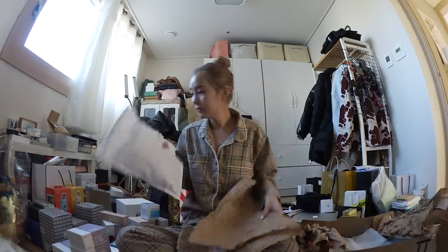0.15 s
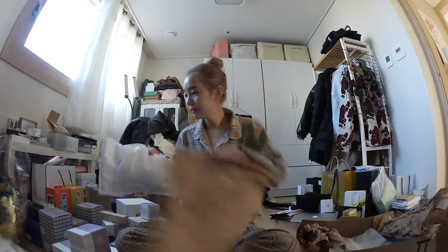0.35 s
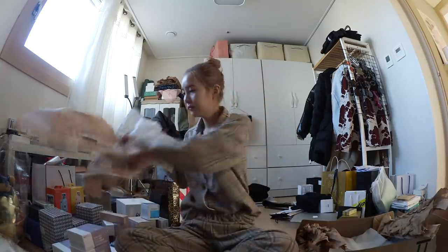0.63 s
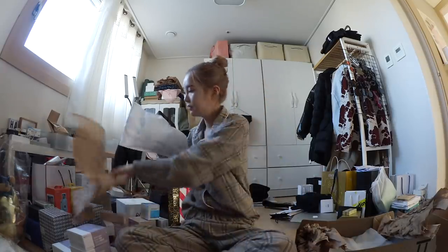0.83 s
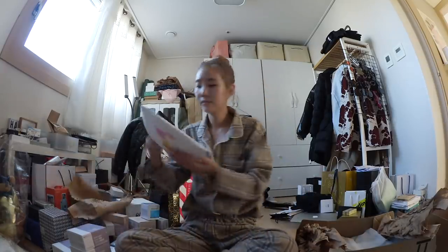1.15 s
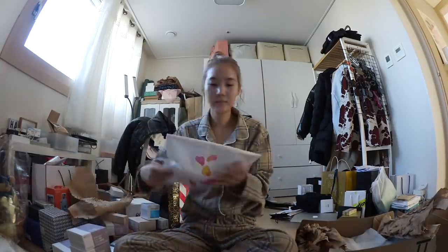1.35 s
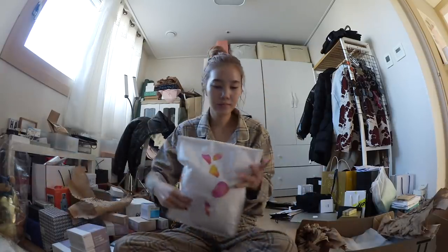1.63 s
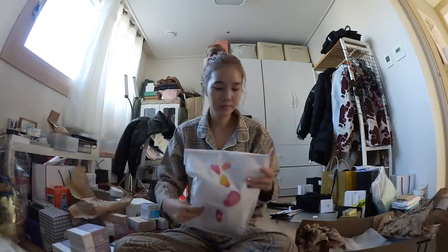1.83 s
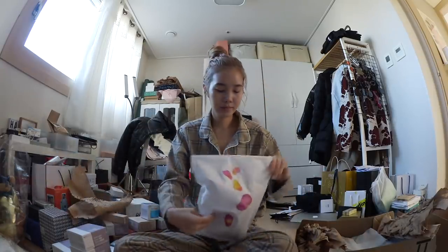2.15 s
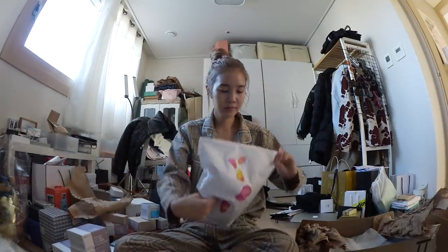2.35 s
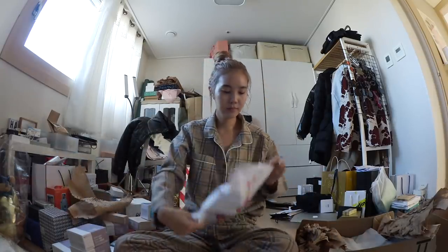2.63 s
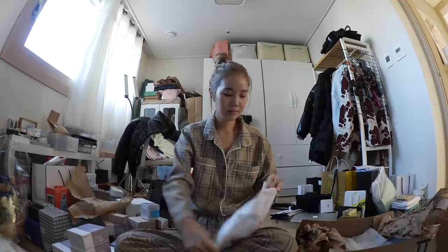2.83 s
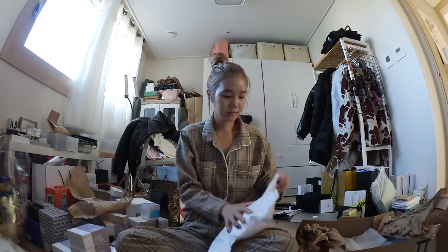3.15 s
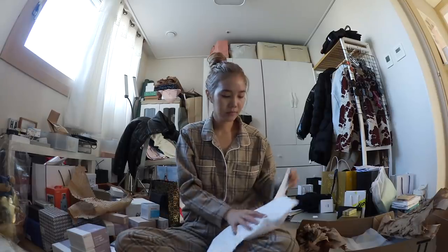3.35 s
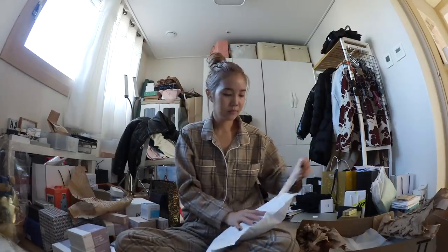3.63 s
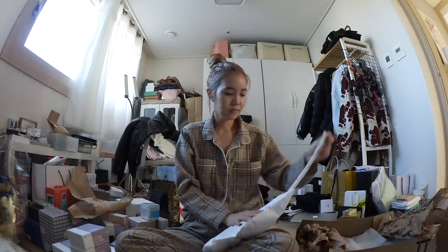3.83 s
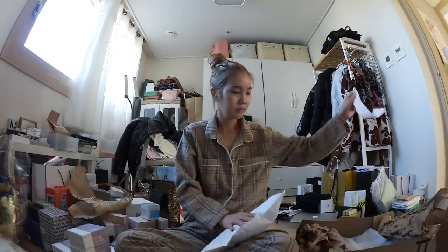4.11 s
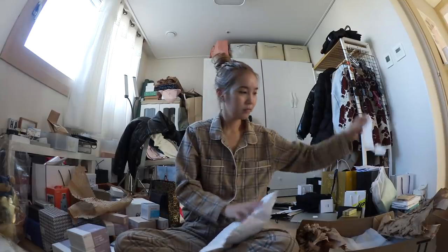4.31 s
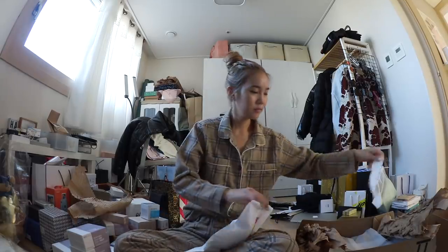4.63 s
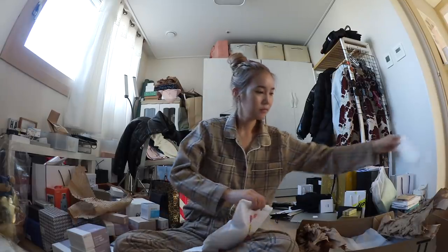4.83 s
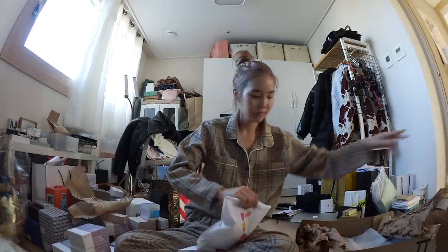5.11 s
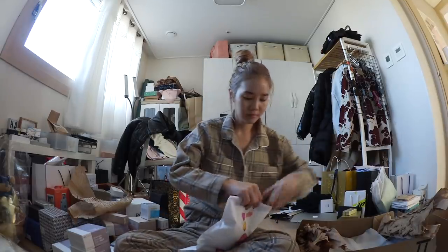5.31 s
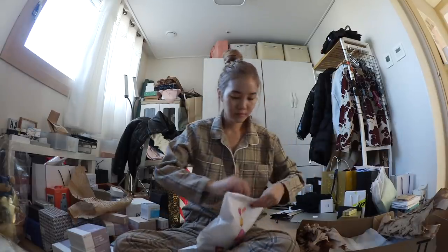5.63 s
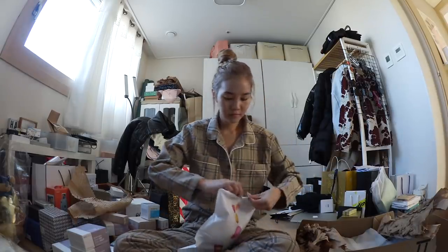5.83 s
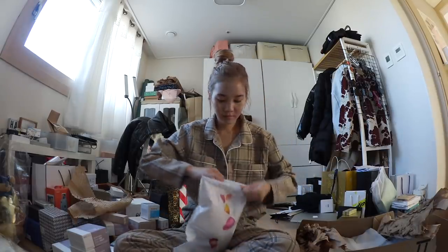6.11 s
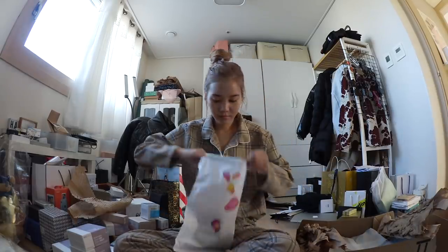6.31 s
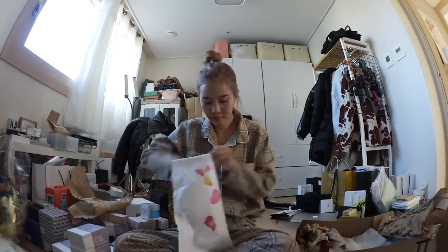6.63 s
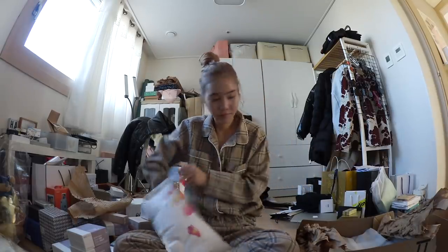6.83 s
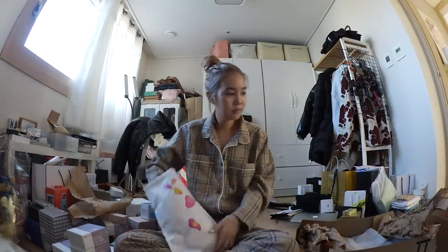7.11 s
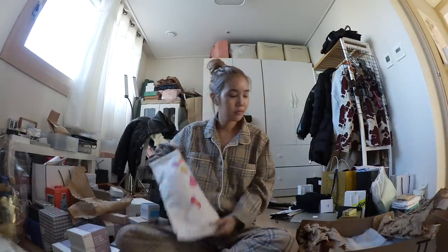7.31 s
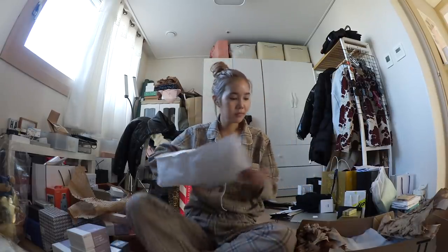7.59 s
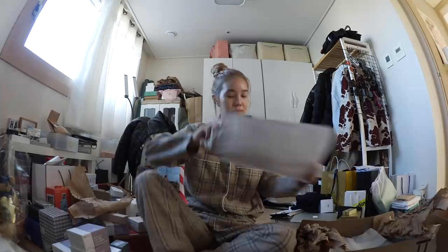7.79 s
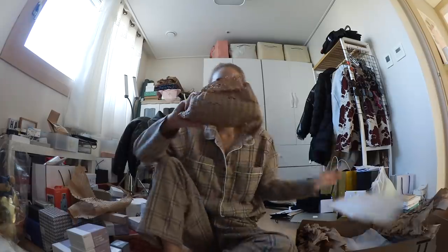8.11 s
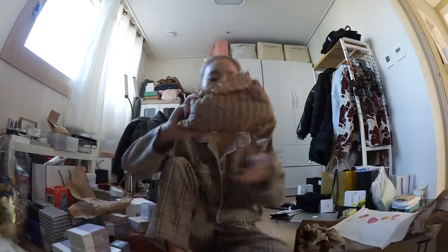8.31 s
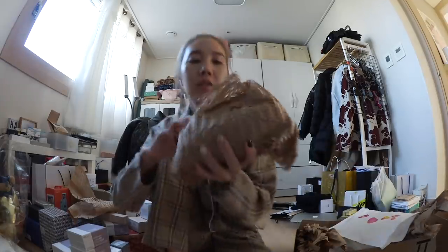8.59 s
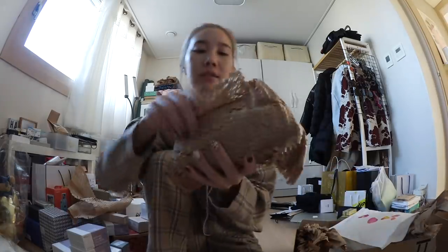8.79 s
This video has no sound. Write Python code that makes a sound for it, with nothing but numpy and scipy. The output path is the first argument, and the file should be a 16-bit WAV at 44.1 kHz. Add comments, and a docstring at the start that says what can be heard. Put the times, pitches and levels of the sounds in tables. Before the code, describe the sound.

Stiff paper crackles almost continuously in busy hands, close and dry, slightly left of centre. Sharp snaps thicken after the first second, swell into loud scrunches around three to four seconds, thin out, then return strongly past six seconds. Low air-filled slaps and boxy panel knocks punctuate it. The end is sparse, light and crisp, over a faint indoor hush.

```python
"""Paper mailer in busy hands

Hands turn, tear and crumple a paper mailer and packing paper, close to two microphone ports in a small room.
Creases snap as noise cracks with ringing facets, over a rustle of countless small noise-burst buckles.
Slaps on the bag's air pocket and knocks of a folded panel are short damped tones.
Near echoes from floor and lap colour all the paper; a short room answer, room tone and rumble lie behind it."""
import sys
import numpy as np
from scipy import signal
from scipy.fft import rfft, irfft, next_fast_len
from scipy.io import wavfile
from scipy.ndimage import uniform_filter1d, map_coordinates

SR = 44100
rng = np.random.default_rng(int(sys.argv[2]) if len(sys.argv) > 2 else 0)


def master_out(mix):
    """Clip the mix to full scale and print it as 16-bit PCM to the path in sys.argv[1]."""
    frames = np.transpose(np.atleast_2d(mix))
    ceiling = np.clip(frames, -1, 1)
    pcm = np.round(ceiling * 32767).astype(np.int16)
    wavfile.write(sys.argv[1], SR, pcm)


N = 394694  # length in samples


def amp(db):
    """Gain of a dB value."""
    return 10 ** (np.asarray(db) / 20)


def unit(x):
    """Scaled to rms 1."""
    return x / np.sqrt(np.mean(x ** 2) + 1e-20)


def along(points, hz):
    """Reads (Hz, value) points on a log frequency axis."""
    point_hz, value = np.transpose(points)
    return np.interp(np.log(hz + 1), np.log(point_hz + 1), value)


def curves(rows):
    """One value per sample for each column after the time."""
    s, *columns = np.transpose(rows)
    return [np.interp(np.arange(N) / SR, s, column) for column in columns]


def wobble(rate):
    """A smooth random curve, rate knots a second."""
    knots = rng.standard_normal(int(N * rate / SR) + 4)
    return map_coordinates(knots, [np.arange(N) * rate / SR])


def filtered(x, response):
    """x times a response of frequency."""
    size = next_fast_len(N + 8192)  # padding keeps the end from wrapping onto the start
    return irfft(rfft(x, size) * response(np.fft.rfftfreq(size, 1 / SR)), size)[..., :N]


def panned(pan_db):
    """Left and right gain for a left-over-right difference in dB."""
    return amp(np.array([pan_db / 2, -pan_db / 2]))


def overlaid(s, gain, shapes):
    """Adds one shape per start time into a full-length track, once for each row of gains."""
    start = np.round(s * SR).astype(int)
    where = (start[:, None] + np.arange(shapes.shape[1])).ravel()
    return np.array([np.bincount(where, (g[:, None] * shapes).ravel(), N + SR)[:N] for g in gain])


def strokes(length_s, rise_ms, fall_ms):
    """Exponential rise and fall of peak 1, one row per fall time, with the time axis in ms."""
    ms = np.arange(int(SR * length_s)) * 1000 / SR
    shape = (1 - np.exp(-ms / rise_ms)) * np.exp(-ms / fall_ms[:, None])
    return ms, shape / shape.max(axis=1, keepdims=True)


def bursts(s, gain, rise_ms, fall_ms):
    """Envelope of many bursts that rise fast and die away; their powers add."""
    _, shape = strokes(.05, rise_ms, fall_ms)
    return np.sqrt(overlaid(s, np.asarray(gain) ** 2, shape ** 2))


def rings(s, gain, hz, rise_ms, fall_ms):
    """Damped tones that start at the given moments."""
    ms, shape = strokes(.08, rise_ms, fall_ms)
    return overlaid(s, gain, shape * np.sin(2 * np.pi * hz[:, None] * ms / 1000))


# How unlike the two ports hear a noise. Each row: frequency in Hz, side over mid in dB.
SPREAD = [(60, -25), (110, -42), (200, -20), (380, -24.5), (700, -12.5), (1290, -9), (2380, -28.5),
          (4400, -14), (8120, -11.5), (15000, -9)]


def hiss(spectrum, patchy_db):
    """Stereo noise in small ringing patches: a shared part, plus and minus a part that tells the ports apart."""
    grid = signal.stft(rng.standard_normal((2, N)), nperseg=256)[2]
    patches = uniform_filter1d(rng.standard_normal(grid.shape[1:]), size=3, axis=0)
    patches = uniform_filter1d(patches, size=4, axis=1)
    pair = signal.istft(grid * amp(patchy_db * unit(patches)), nperseg=256)[1][:, :N]
    mid, side = filtered(pair, lambda hz: amp(along(spectrum, hz) + [0 * hz, along(SPREAD, hz)]))
    return np.array([mid + side, mid - side])


# Colour of the paper, as a shape within each range. Each row: frequency in Hz, relative density in dB per Hz.
PAPER = [(18, -58), (30, -19), (131, -8), (200, -10.5), (400, -3.5), (640, 2), (1000, 0.5), (2200, -0.5),
         (4030, -7), (7790, -9), (13900, -22), (16300, -50)]
# Borders between the five ranges of the sheet, lowest first, in Hz.
EDGES_HZ = [300, 1200, 4500, 9500]


def sheet_noise(patchy_db):
    """The sheet's vibration in five ranges of rms 1: air pocket, body, face, crisp edge, sizzle."""
    noise = hiss(PAPER, patchy_db)
    below = [filtered(noise, lambda hz: 1 / (1 + (hz / border) ** 6)) for border in EDGES_HZ]
    return [unit(upper - lower) for lower, upper in zip([0] + below, below + [noise])]


# Where the hands are. Each row: time in seconds, left over right in dB.
PLACE = [(0, 2.5), (.55, 3), (.7, 4.5), (1.1, 5), (1.3, 1.5), (2.5, 1.5), (3.8, 1), (4.3, 1.5), (7.4, 2.1),
         (8.05, 1), (8.27, -3), (8.34, 3), (8.95, 2)]
SNAP_MS = 2.25  # fall time of the crack's face range
CREST_DB = 8  # the noise envelope sits this far under the listed crease level


def snaps():
    """A crease lets go: a crack whose treble dies first, and the freed facet rings at its own pitch."""
    s, db, hz, crisp_db, body_db = creases()
    ms = SNAP_MS + 0 * s
    _, body, face, edge, sizzle = sheet_noise(patchy_db=0.5)
    pan_db = np.interp(s, *np.transpose(PLACE)) + 0.66 * rng.standard_normal(len(s))
    gain = amp(db - CREST_DB) * panned(pan_db)
    # the ring takes the level of the range its pitch falls in
    facet_db = np.where(hz < EDGES_HZ[1], body_db, np.where(hz < EDGES_HZ[2], 0, crisp_db))
    return (body * bursts(s, gain * amp(body_db), rise_ms=1.3, fall_ms=1.98 * ms)
            + face * bursts(s, gain, rise_ms=0.21, fall_ms=ms)
            + edge * bursts(s, gain * amp(crisp_db), rise_ms=.25, fall_ms=0.99 * ms)
            + sizzle * bursts(s, gain * amp(crisp_db - 19.5), rise_ms=0.12, fall_ms=0.27 * ms)
            + rings(s, gain * amp(facet_db + 3.0), hz, rise_ms=0.11, fall_ms=0.61 * ms + 2500 / hz))


# Creases that snap loudly. Each row: start in seconds, level in dB, ring pitch in Hz,
# crispness over the face range in dB, body over the face range in dB.
SNAPS = [(0.0172, -9, 1560, -2, -6), (0.168, -12, 1870, -1, -11), (0.2184, -9.5, 2110, -1.5, -6.5),
         (0.3108, -11, 2060, -4, -12), (0.3578, -15, 2020, -13, -2), (0.3724, -26, 6600, -3, -9),
         (0.384, -15, 657, -11, -2.5), (0.4214, -22, 7180, 3.5, -11), (0.6066, -23, 2930, -6, -15),
         (0.6115, -15, 2920, -12, -18), (0.6868, -26, 689, -15, -0.5), (0.7756, -13.5, 1930, -2, -5),
         (0.829, -17, 734, -10, -4), (1.1192, -12, 2320, 2, -13), (1.1284, -12, 533, -12, -3),
         (1.1388, -13.5, 2240, 3, -9), (1.198, -14.5, 3040, -12, -1.5), (1.2153, -15.5, 886, -9, -7),
         (1.2585, -6.5, 2260, 5.5, -10.5), (1.2885, -12.5, 560, -5, -7), (1.3534, -10, 2170, -15, -11),
         (1.3663, -10, 2350, -7, -7), (1.3976, -10, 1490, -5, -9), (1.4182, -14, 2460, -3, -12),
         (1.4381, -9, 2200, 3.5, -16), (1.4789, -6, 2050, -2, -22), (1.4851, -8, 1590, 5.5, -22),
         (1.5004, -15, 684, 4, -11), (1.51, -7.5, 616, -12, -7), (1.5667, -11, 2150, -7, -1.5),
         (1.5805, -10.5, 1970, -1, 1), (1.5915, -10.5, 633, -5, -1), (1.6134, -17, 6000, -1, -9),
         (1.6185, -13, 2050, -3, -9), (1.625, -13, 1590, 2, -9), (1.634, -16, 1980, -8, -9),
         (1.6626, -12, 587, -11, -5), (1.6758, -4.5, 3170, 1, -15), (1.6934, -10, 563, -3, -6),
         (1.7085, -3, 2090, -8, -12), (1.7547, -12, 6590, 0.5, -7), (1.7883, -4, 1900, -4, -8),
         (1.7991, -6, 2230, 4, -9), (1.8395, -12.5, 2430, -3, -9), (1.852, -11, 7190, 3.5, -9),
         (1.869, -10.5, 3490, -1, -3), (1.882, -16, 2540, 8, -12), (1.9033, -11, 2410, -9, -5),
         (1.9096, -7.5, 2360, -2.5, -6), (1.936, -13, 1570, -1, -4), (1.957, -13, 622, -3, -6),
         (1.9718, -13.5, 640, -5, -10), (1.992, -6.5, 2160, 1.5, -25), (2.0517, -20, 2350, -7, -7),
         (2.0794, -9.5, 1500, 0, -6), (2.1056, -11.5, 2220, -0.5, -10), (2.1994, -8.5, 2060, -1.5, -6),
         (2.2194, -10.5, 2450, -5, -5), (2.2283, -6.5, 626, -15, -8), (2.2412, -7, 2670, -6, -5),
         (2.257, -12, 2180, -7, -5), (2.2977, -9, 2420, -21, -12), (2.3272, -8.5, 3160, 0.5, -16),
         (2.3408, -10, 1410, -3, -12), (2.3597, -6.5, 1460, -16, -3.5), (2.3754, -14, 1500, -6, -7),
         (2.4153, -17, 2110, -4, -9), (2.4527, -10.5, 2340, -11, -6), (2.4572, -10, 1590, -12, -13),
         (2.4696, -2.5, 2270, -14, -19), (2.495, -9.5, 2340, -1.5, -14), (2.5054, -11, 640, -1, -12),
         (2.551, -5.5, 8050, 2.5, -11), (2.5801, -7, 2280, -8, -17), (2.6011, -4, 622, -6, -10),
         (2.619, -8, 2620, 3.5, -10), (2.632, -7, 3250, 2.5, -17), (2.6601, -9.5, 2390, 5, -16),
         (2.7088, -7.5, 3350, 1, -7), (2.7241, -13.5, 1450, 2, -3), (2.7746, -8.5, 2970, -0.5, -4.5),
         (2.7928, -9.5, 2720, -3, -6.5), (2.829, -11, 1630, -1, -13), (2.8938, -12, 690, -24, -0.5),
         (2.9078, -6.5, 2110, -3, 0), (2.9158, -6, 1460, 3, -2), (2.9844, -14, 2280, 0, -9),
         (3.0378, -11, 1310, 4.5, -15), (3.0591, -5, 1420, -4, -21), (3.1111, -10.5, 1610, -1, -6),
         (3.1298, -13, 1400, -14, 0), (3.1647, -9.5, 650, -4, -2), (3.1843, -17, 3170, -1, -9),
         (3.1908, -14, 2370, 4, -14), (3.2085, -8, 1450, -4, -13), (3.2947, -7, 980, -6, -5),
         (3.345, -5, 2170, -12, -1), (3.4261, -10, 2130, -6, -7), (3.4594, -1.5, 1360, -5, -4),
         (3.4744, -5, 1390, -1, -3), (3.5239, -14, 3250, -3, -10), (3.6057, -15.5, 5550, 3, 0),
         (3.686, -13, 2050, -6, -11), (3.7569, -6.5, 2510, -3, -6), (3.917, -4, 2000, -20, -7),
         (3.9405, -5, 2450, -4, -13), (3.9664, -9, 2540, 0, -18), (4.0164, -19.5, 4630, 5, -18),
         (4.0404, -19, 7680, -1, -9), (4.1255, -15.5, 2700, -12, -4.5), (4.1322, -13.5, 1490, -1, -11),
         (4.249, -9.5, 1470, 3, -12), (4.3002, -21, 630, -9, -2), (4.3433, -10.5, 3000, -6, -0.5),
         (4.365, -10, 1400, -24, -1), (4.4448, -16, 945, -17, 3), (4.539, -15.5, 1560, -14, -3),
         (4.5543, -11.5, 1830, -20, -1.5), (4.5977, -17, 2240, -15, -1), (4.6524, -22.5, 4060, -5, -12),
         (4.7051, -13.5, 3240, 5.5, -9), (4.7433, -10.5, 1430, -9, -10), (4.802, -13, 1610, 3, -3),
         (4.805, -18, 6270, 9, -9), (4.8281, -9.5, 2470, 8, -10), (4.8473, -10, 2510, -1, -13),
         (4.8546, -14.5, 2430, -3, -16), (4.8893, -19, 1560, -5, -9), (4.8993, -21.5, 3100, -3, -16),
         (4.9157, -11, 1910, -12, -8), (4.95, -17.5, 1030, -9, -11), (5.0649, -24, 2200, 4, -9),
         (5.0861, -12.5, 1390, -6, -6), (5.1138, -9, 929, 1.5, -5), (5.1395, -5, 2360, 1.5, -10),
         (5.188, -16, 1460, -3, -6), (5.227, -24, 1390, -8, -6), (5.2465, -20.5, 2040, -15, 2.5),
         (5.293, -22, 6550, 1, -9), (5.3085, -13, 5900, -2.5, -21), (5.3527, -26, 3120, 0, -11),
         (5.3924, -14, 1120, -6, -9), (5.5009, -14.5, 6200, -3, -12), (5.566, -9, 1460, -2, -9),
         (5.5843, -12.5, 1400, -1, -7), (5.6093, -7.5, 2230, -4, -6), (5.6738, -20, 1040, -17, -1),
         (5.7, -17, 3160, -3, -4), (5.7107, -10.5, 6020, 5, -5), (5.7744, -14, 667, -20, 3.5),
         (5.799, -15.5, 8000, 7, -9), (5.8232, -14.5, 1430, -2, -3), (5.8848, -12.5, 5700, 2.5, -16),
         (5.914, -11, 3460, -4.5, -7), (5.9803, -19, 2440, 6, -5), (6.0606, -18, 3080, -3, -9),
         (6.0896, -14, 625, 6, -9), (6.124, -12, 2120, -0.5, -15), (6.1838, -9, 1030, -7, 1),
         (6.2066, -18, 685, -11, -5), (6.2362, -8.5, 634, -4, -5), (6.2499, -4.5, 2000, 4, -8),
         (6.2721, -1.5, 4740, -2, -12), (6.2814, -8, 2210, 8.5, -13), (6.3028, -7.5, 2450, 7, -6),
         (6.3526, -8, 930, -6, -2), (6.38, -12, 2650, -0.5, -3), (6.405, -18, 923, 1, -9),
         (6.454, -17.5, 2900, 2, -16), (6.479, -12.5, 2880, -1.5, -15), (6.5208, -8.5, 2040, -2, -14),
         (6.545, -9, 1040, -6, -3), (6.5604, -17.5, 3820, -9, -1.5), (6.608, -16, 2880, 4, -14),
         (6.6845, -8.5, 1400, -7, -7), (6.7101, -8.5, 1930, 3, -2), (6.7358, -8, 2930, 0, -7),
         (6.7446, -9.5, 2150, 4.5, -5), (6.7625, -10.5, 1510, -11, -7), (6.787, -7.5, 2500, -2, -4.5),
         (6.8256, -8.5, 1560, 0, -7), (6.8428, -9, 3360, -12, -3), (6.8658, -10.5, 1490, 1, 1),
         (6.8734, -13, 5930, -1, -9), (6.8954, -15.5, 2540, 11, -9), (6.9023, -5, 1830, -1, -5),
         (6.9212, -9.5, 1840, 2.5, -13), (7.0125, -18, 2000, -19, 2.5), (7.0264, -15, 2100, -17, -7),
         (7.0574, -15, 1460, -16, -7), (7.0703, -12, 975, -20, -3), (7.0874, -15, 692, -3, -5),
         (7.1838, -7, 4440, -3, -6), (7.1912, -9.5, 1490, -9, -7), (7.2067, -13.5, 1450, -11, -12),
         (7.2856, -14.5, 517, 5.5, -0.5), (7.3174, -21, 452, -3, -2), (7.3555, -7.5, 2070, 2, -4.5),
         (7.3614, -10, 4540, -0.5, -5), (7.3704, -15, 635, 1, -4), (7.393, -13.5, 2140, 3.5, -3),
         (7.4588, -11.5, 6340, 2.5, -16), (7.485, -14.5, 3000, -1, -7), (7.543, -11.5, 5720, -0.5, -4.5),
         (7.6291, -16, 1990, -3, -13), (7.6554, -8, 650, -2, -9), (7.711, -17, 5660, 4, -12),
         (7.7196, -8, 5550, -0.5, -13), (7.7682, -13, 1640, -1, -12), (7.8396, -20, 630, -8, -12),
         (7.879, -12.5, 1580, -14, -6), (7.988, -12.5, 2300, 7, -9), (7.9984, -12.5, 7700, 2.5, -14),
         (8.1262, -19, 2510, 5.5, -7), (8.1388, -16.5, 2100, -1, -2.5), (8.1766, -31, 6400, 9.5, -9),
         (8.2617, -15.5, 1430, 4.5, -14), (8.3009, -11, 1430, -1, -7), (8.3225, -12.5, 2240, 1, -7),
         (8.503, -26, 5600, 7, -13), (8.539, -22.5, 6700, 17, -13), (8.6313, -19.5, 7100, 7.5, -7),
         (8.7182, -19, 7490, 7, -7), (8.8752, -18.5, 7290, 7, -14), (8.8829, -17, 8500, 6, -9),
         (8.9101, -28, 6290, -1, -9), (8.9424, -22, 7140, -3, -9)]
TICKS_PER_S, TICK_DB = 25, 5.5  # small creases: rate, least level over the effort curve
BODY_DB = -5.5  # body share of a small crease that rings at 2 kHz
BODY_DB_PER_OCTAVE = -3  # a larger, lower facet moves more of the sheet


def creases():
    """The loud snaps, and small ones that come at random and are as strong as the hands work."""
    count = int(TICKS_PER_S * N / SR)
    when, size, pitch, crisp = rng.random((count, 4)).T
    s = when * (N - 1) / SR
    hz = 900 * 2 ** (3 * pitch)  # within three octaves
    db = np.interp(s, *np.transpose(EFFORT)) + TICK_DB + 8 * size
    crisp_db = 12 * crisp - 9
    body_db = BODY_DB + BODY_DB_PER_OCTAVE * np.log2(hz / 2000)
    return np.hstack([np.transpose(SNAPS), [s, db, hz, crisp_db, body_db]])


TRAIL_DB, TRAIL_MS = -24, 15  # rustle after a snap: level against the snap, fall time


def settling():
    """After each loud snap the sheet rustles on for a moment."""
    s, db = np.transpose(SNAPS)[:2]
    return bursts(s, [amp(db + TRAIL_DB)], rise_ms=2.44, fall_ms=TRAIL_MS + 0 * s)[0]


# How hard the hands work the paper. Each row: time in seconds, level of the rustle's face range in dB.
EFFORT = [(0, -42), (.123, -45.5), (.34, -40), (.588, -47), (.69, -44), (.74, -31), (.81, -30.5),
          (.926, -58.5), (.964, -44.5), (1.098, -41), (1.241, -40.5), (1.34, -33), (1.421, -24.5),
          (1.463, -36), (1.58, -34.5), (1.919, -37), (2.03, -38.5), (2.17, -37.5), (2.24, -33),
          (2.348, -30.5), (2.43, -37.5), (2.619, -29.5), (2.695, -30), (2.85, -41), (2.931, -22.5),
          (3.258, -39.5), (3.348, -24.5), (3.451, -19.5), (3.49, -26), (3.585, -40.5), (3.629, -27.5),
          (3.804, -20), (3.953, -23), (4.001, -34), (4.106, -44.5), (4.209, -47), (4.3, -40.5),
          (4.549, -33), (4.637, -50), (4.67, -40), (4.843, -38), (5.015, -47), (5.08, -40.5), (5.268, -45),
          (5.354, -39.5), (5.398, -32.5), (5.467, -44), (5.557, -28.5), (5.676, -45), (5.903, -34.5),
          (5.95, -44), (5.982, -38), (6.079, -30.5), (6.165, -37), (6.279, -25.5), (6.43, -38),
          (6.549, -32.5), (6.585, -36), (6.618, -28.5), (6.701, -25), (6.817, -37.5), (6.908, -24.5),
          (6.996, -41.5), (7.084, -32.5), (7.275, -33), (7.42, -38), (7.749, -32.5), (7.829, -25),
          (7.986, -25.5), (8.053, -41.5), (8.14, -42), (8.25, -58.5), (8.263, -29.5), (8.336, -27),
          (8.394, -40), (8.473, -48.5), (8.55, -34.5), (8.726, -37.5), (8.804, -52.5), (8.888, -37),
          (8.95, -29)]
# Colour of the rustle. Each row: time in seconds, body over face in dB, crisp edge over face in dB,
# sizzle over crisp edge in dB.
COLOUR = [(0, -4.5, -1, -7), (.38, -3.5, 1.5, -6), (.6, -5.5, -3, -9), (1, -3.5, -1, 2.5),
          (1.2, -4, -2, -15), (2.4, -2, -7, -17), (2.9, -3, -2.5, -11.5), (3.3, 6, -2.5, -10),
          (3.42, -4.5, -1.5, -6.5), (3.8, -3, -1.5, -7.5), (3.95, -3.5, -3, -2.5), (4.1, -1.5, 1.5, -16),
          (4.5, 0.5, -2.5, -10), (5, -4.5, -5, -12), (5.9, 1, -1.5, -19), (6.28, -3.5, -6.5, -11),
          (6.4, 0, -1.5, -14), (6.62, -12, -4.5, -23), (6.7, 2, -3.5, -20), (7.3, -1, 0.5, -19),
          (7.8, 0, -1, -22), (8, -6.5, -2.5, -7), (8.28, 0, -2.5, -17), (8.46, -1.5, -2, -11),
          (8.55, -8, 8.5, -10), (8.78, 0.5, 6, -8), (8.95, -4, 7, -5)]
# Bass beyond what the effort gives. Each row: time in seconds, gain of the air pocket in dB.
BASS = [(0, 3), (.7, -6), (1.2, -1.5), (2.4, -0.5), (2.95, 0), (3.2, 1), (3.8, -7), (4.3, 1.5), (5.4, 0),
        (6, -1.5), (7.3, -4), (7.85, -2.5), (8, -5.5), (8.2, 7), (8.33, 12), (8.45, 3), (8.58, -7),
        (8.76, 3.5), (8.95, 1)]
POCKET_DB, POCKET_FOLLOWS = -43, .8  # air pocket at an effort of -33.5 dB; dB gained per dB of effort


def rustle():
    """The moving sheet buckles hundreds of times a second, in clumps; the air pocket follows the effort."""
    effort_db, = curves(EFFORT)
    body_db, crisp_db, sizzle_db = curves(COLOUR)
    pocket, body, face, edge, sizzle = sheet_noise(patchy_db=2.5)
    per_second = 600 * amp(2.9 * wobble(40))
    happens = rng.random(N) < per_second / SR
    # doubling the dB turns a level into a power
    shared = happens * amp(2 * 2.45 * rng.exponential(size=N).clip(0, 3))
    sheet = (body * amp(body_db) * buckles(shared, own_db=0.5, fall_ms=6.8, smooth=0.057)
             + face * buckles(shared, own_db=5.0, fall_ms=8.0, smooth=0.32)
             + edge * amp(crisp_db) * buckles(shared, own_db=0.5, fall_ms=4.3, smooth=0.46)
             + sizzle * amp(crisp_db + sizzle_db) * buckles(shared, own_db=2.0, fall_ms=2.3, smooth=0.24))
    strength = np.hypot(amp(effort_db), settling())
    pocket_db = POCKET_DB + POCKET_FOLLOWS * (effort_db + 33.5) + curves(BASS)[0] + 2.65 * wobble(14)
    return panned(curves(PLACE)[0]) * strength * sheet + amp(pocket_db) * pocket


def buckles(shared, own_db, fall_ms, smooth):
    """Clumped small buckles over a smooth rub; each range hears each buckle at its own strength."""
    power = shared * amp(2 * own_db * rng.standard_normal(N))
    keep = np.exp(-2000 / (SR * fall_ms))  # power dies twice as fast as amplitude
    grain = signal.lfilter([1], [1, -keep], power)
    return np.sqrt(smooth + (1 - smooth) * grain / grain.mean())


# Slaps on the air pocket. Each row: start in seconds, level in dB, pitch in Hz.
THUMPS = [(0.34, -31, 140), (0.675, -35, 221), (1.125, -30, 120), (1.195, -28, 130), (1.29, -27, 138),
          (1.41, -31, 130), (1.571, -36, 188), (1.867, -23, 144), (2.219, -33, 150), (2.365, -34, 207),
          (2.62, -33, 110), (2.787, -31, 119), (2.91, -26, 155), (3.119, -26.5, 123), (3.924, -23, 170),
          (4.122, -30, 151), (4.225, -31, 132), (4.359, -35, 140), (4.547, -29, 139), (4.7, -32, 104),
          (5.592, -28, 145), (5.966, -31, 118), (6.088, -27, 134), (6.228, -30, 180), (6.765, -37, 148),
          (6.833, -26, 236), (7.16, -36, 121), (7.37, -36, 150), (7.805, -22, 144), (7.851, -21, 134),
          (8.013, -34, 134), (8.26, -29, 242), (8.289, -35, 146), (8.317, -21, 210)]
# Hollow knocks of a folded panel. Each row: start in seconds, level in dB before a 1.5 dB trim, pitch in Hz.
KNOCKS = [(0.348, -16, 1110), (0.384, -36, 680), (0.405, -20, 723), (1.05, -28, 796), (1.323, -18.5, 634),
          (3.274, -9, 910), (3.567, -19.5, 977), (4.033, -39, 705), (4.457, -18, 650), (4.498, -25.5, 474),
          (4.966, -29, 434), (5.541, -22.5, 417), (6.092, -19, 416), (7.119, -31, 918), (7.586, -22, 675),
          (8.282, -19, 617)]


def thumps():
    """A slap pushes the bag's air pocket or a folded panel: a soft push that rings for a few cycles."""
    s, db, hz = np.transpose(THUMPS)
    pocket = rings(s, [amp(db)], hz, rise_ms=1.1, fall_ms=1600 / hz)
    s, db, hz = np.transpose(KNOCKS)
    panel = rings(s, [amp(db - 1.5)], hz, rise_ms=1.2, fall_ms=3500 / hz)
    return pocket + panel


# Ranges cancelled by near echoes. Each row: centre in Hz, width in Hz, gain in dB at an echo strength of 1.
DIPS = [(296, 143, -7), (521, 110, -5), (825, 260, -8.5), (1200, 340, -7.5), (1740, 510, -3.5),
        (5080, 2400, -1.5)]
# Paper near the floor. Each row: time in seconds, echo strength as a factor.
LOW = [(0, 0.6), (1.2, 0.66), (2.6, 1.1), (3, 1.17), (5, 1.21), (6.4, 1.03), (7.2, 0.83), (8.95, 0.95)]


def dip(f, centre, width, db):
    """Response of one resonant notch that reaches db at its centre."""
    off_centre = centre * centre - f * f
    return (off_centre + 1j * f * width * amp(db)) / (off_centre + 1j * f * width)


def near_echoes(x):
    """Floor and lap echoes within milliseconds cancel a few narrow ranges, more when the paper is low."""
    cancelled = filtered(x, lambda f: np.prod([dip(f, *row) for row in DIPS], axis=0))
    return x + curves(LOW)[0] * (cancelled - x)


# How long the room answers; soft clutter keeps it short. Each row: frequency in Hz, time to fall 60 dB in seconds.
ROOM = [(150, 0.33), (1000, 0.074), (4000, 0.034), (12000, 0.14)]


def room(x):
    """Each frequency of the room's answer dies at its own speed; the close ports share most of it."""
    hz, t, grid = signal.stft(rng.standard_normal((2, SR // 3)), SR, nperseg=256)
    grid *= amp([0 * hz, along(SPREAD, hz) + 3])[..., None]
    decay = amp(-60 * t / along(ROOM, hz)[:, None])
    mid, side = signal.istft(grid * decay, SR, nperseg=256)[1]
    tail = np.array([mid + side, mid - side]) / np.linalg.norm(mid)
    late = np.pad(x, ((0, 0), (200, 0)))  # the answer starts 200 samples after the sound
    return signal.fftconvolve(late, tail, axes=1)[:, :N]


# Colour of the room tone. Each row: frequency in Hz, relative density in dB per Hz.
HUSH = [(18, -48), (30, -14), (138, 27), (287, 3), (632, -24), (7470, -24), (13000, -7), (16000, -43)]


def room_tone():
    """A steady, slightly patchy hush of coloured noise, at rms 1."""
    return unit(hiss(HUSH, patchy_db=3))


def house_rumble():
    """A deep rumble of the house: noise kept below about 45 Hz, at rms 1."""
    return unit(filtered(rng.standard_normal(N), lambda hz: 1 / (1 + (hz / 45) ** 4)))


def scene():
    """Paper with its echoes, the room's answer, the room tone and a rumble whose level wanders."""
    paper = near_echoes(snaps() + rustle() + thumps())
    rumble = amp(-58 + 2.5 * wobble(3.2)) * house_rumble()
    return paper + amp(-14.0) * room(paper) + amp(-60.0) * room_tone() + rumble


# The ports differ in colour. Each row: frequency in Hz, left over right in dB.
PORTS = [(300, 1), (1200, -3), (3000, -1), (8000, -3), (13000, -3)]
# The ports hear the paper a little out of step. Each row: frequency in Hz, phase in radians by which left leads.
LEAD = [(0, 0.24), (860, -0.25), (1460, -0.25), (3360, -0.52), (4130, 0.15), (7150, 0.2), (9040, 0.0),
        (15500, 0.0), (16100, -0.1)]
TOP_HZ = 16400  # band limit


def ports(hz):
    """Level and phase of the left and right port."""
    half_lead = .5j * np.array([[1], [-1]]) * along(LEAD, hz)
    return panned(along(PORTS, hz)) * np.exp(half_lead)


def record(dry):
    """The small microphone loses the deep bass; peaks bend near full scale; nothing is kept above the band limit."""
    thin = filtered(dry, lambda hz: ports(hz) / (1 + (60 / (hz + 1)) ** 3))
    bent = thin / (1 + np.abs(thin / .94) ** 6) ** (1 / 6)
    return filtered(bent, lambda hz: hz < TOP_HZ)


dry = scene()
out = record(dry)
master_out(out)
```